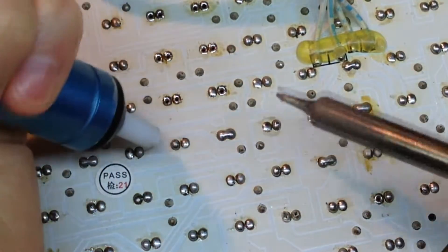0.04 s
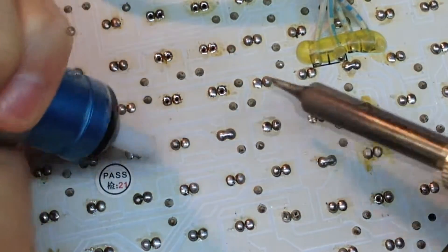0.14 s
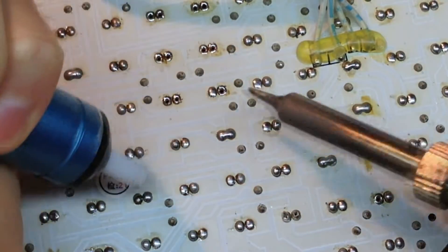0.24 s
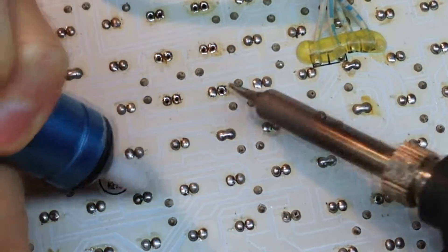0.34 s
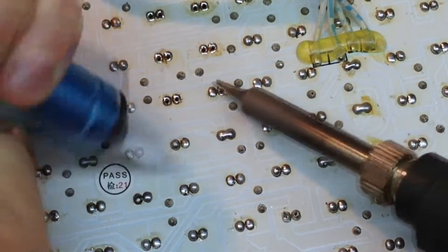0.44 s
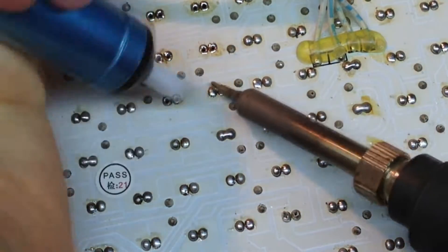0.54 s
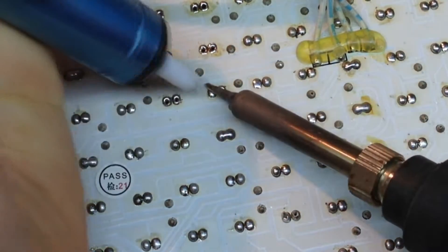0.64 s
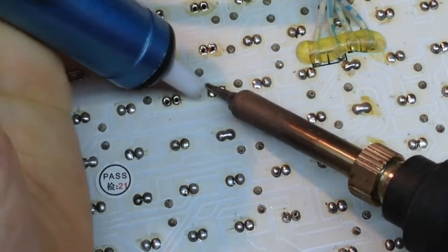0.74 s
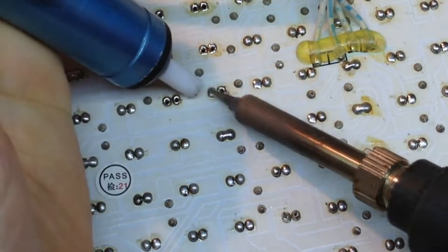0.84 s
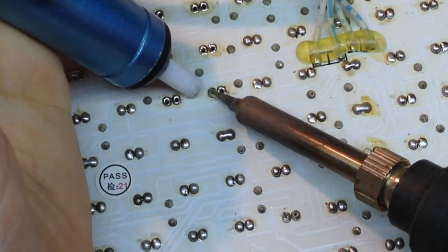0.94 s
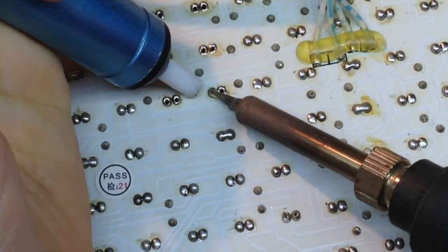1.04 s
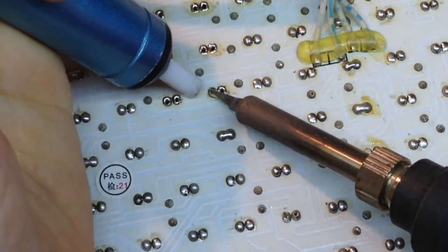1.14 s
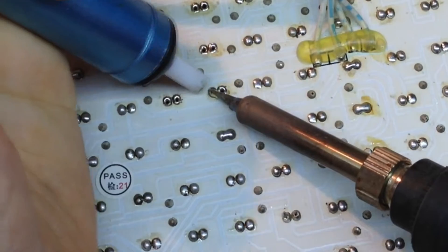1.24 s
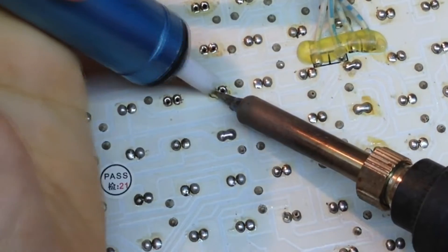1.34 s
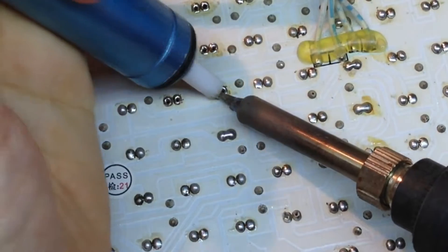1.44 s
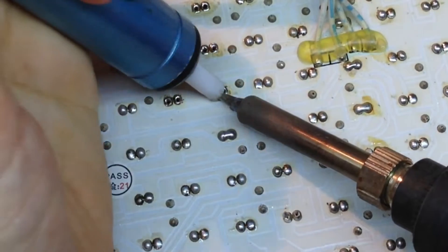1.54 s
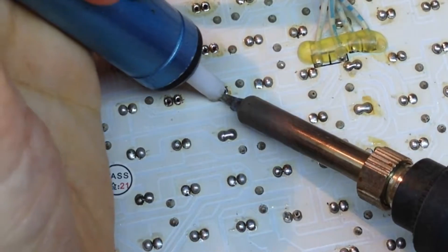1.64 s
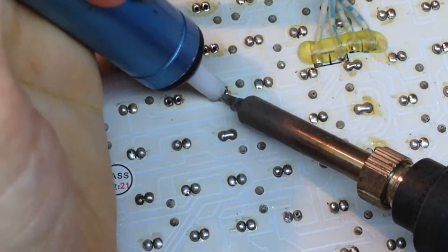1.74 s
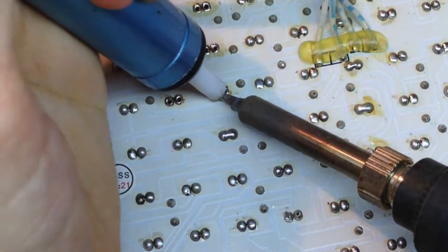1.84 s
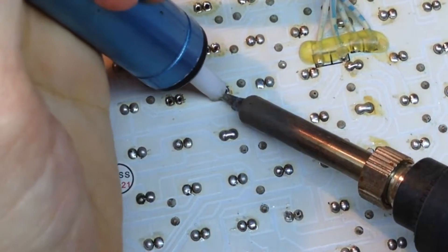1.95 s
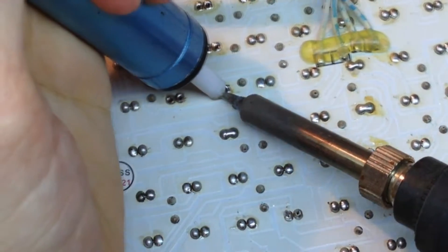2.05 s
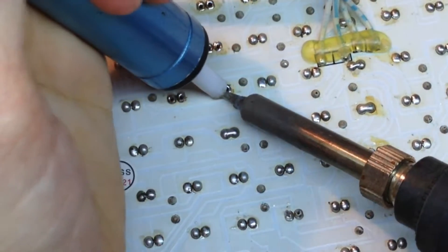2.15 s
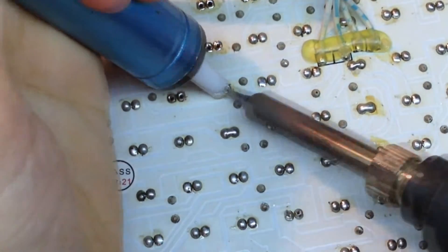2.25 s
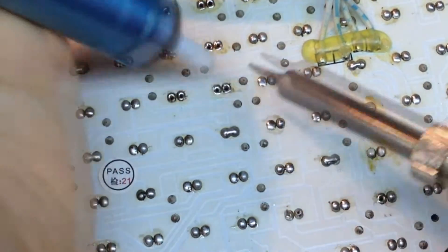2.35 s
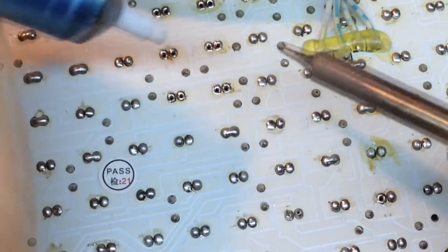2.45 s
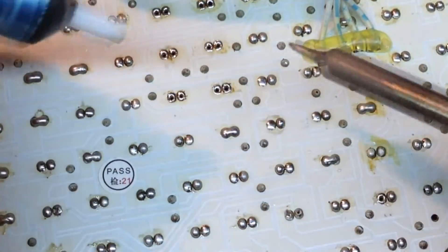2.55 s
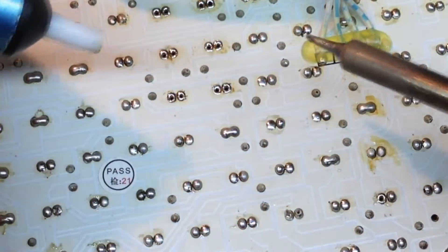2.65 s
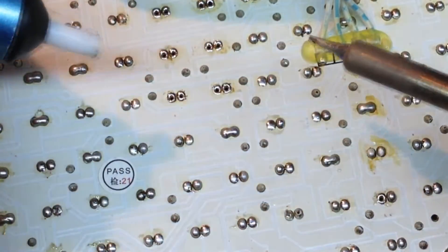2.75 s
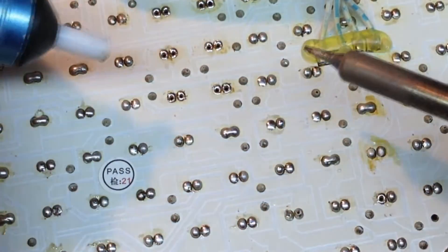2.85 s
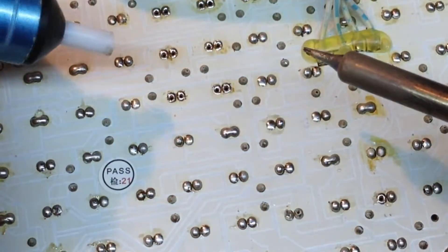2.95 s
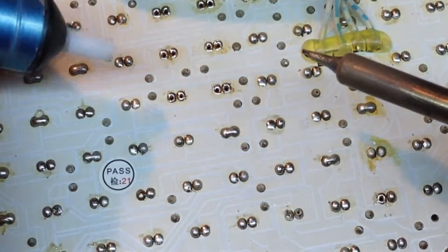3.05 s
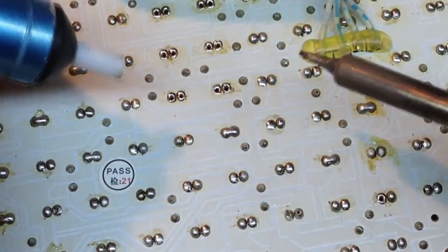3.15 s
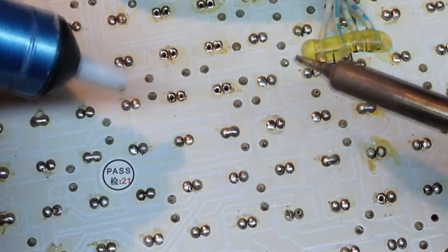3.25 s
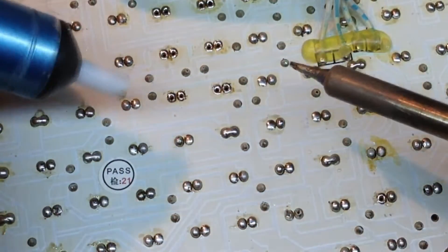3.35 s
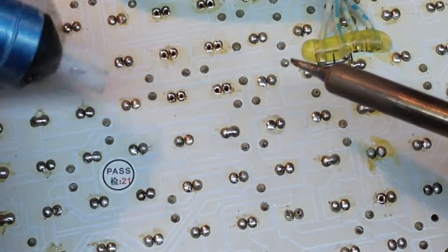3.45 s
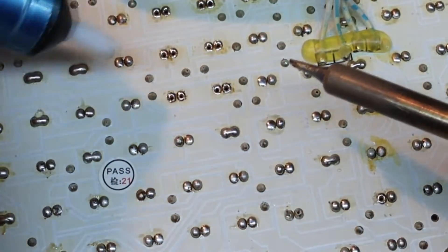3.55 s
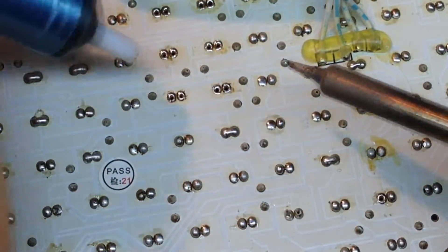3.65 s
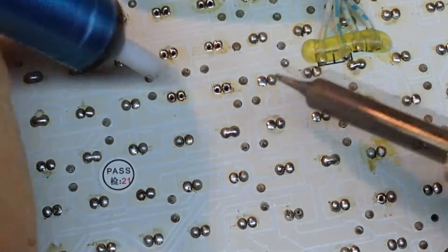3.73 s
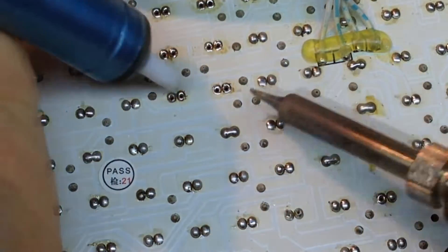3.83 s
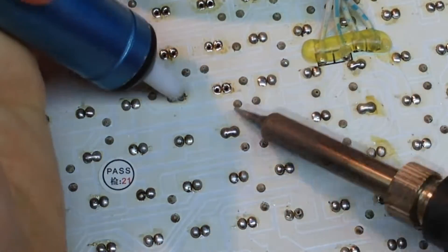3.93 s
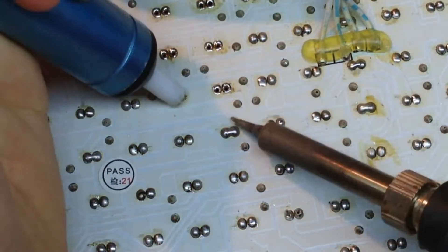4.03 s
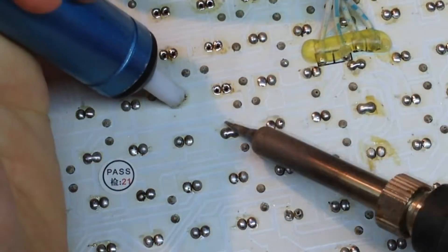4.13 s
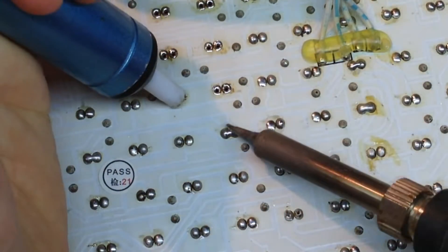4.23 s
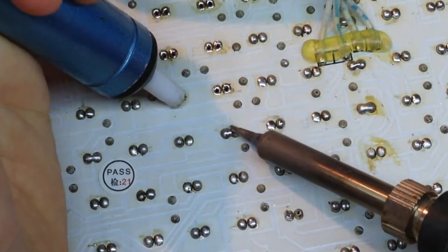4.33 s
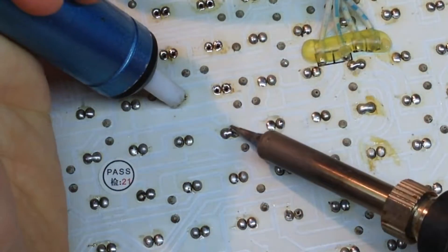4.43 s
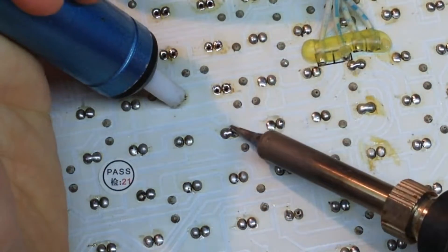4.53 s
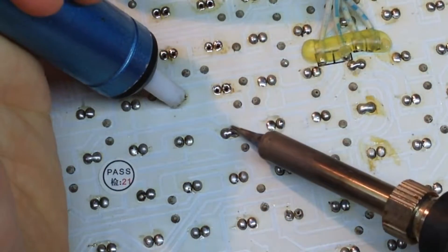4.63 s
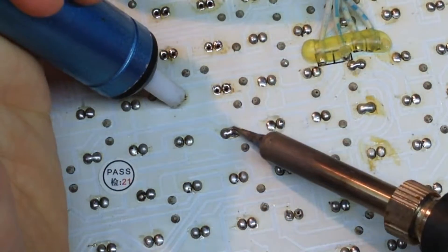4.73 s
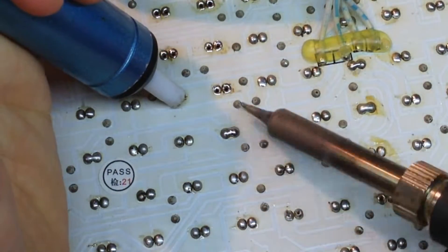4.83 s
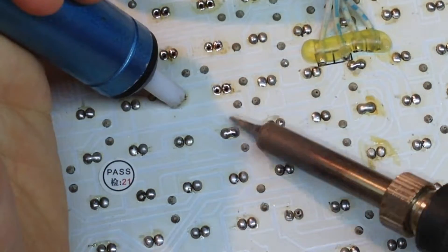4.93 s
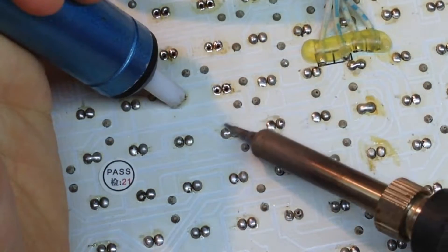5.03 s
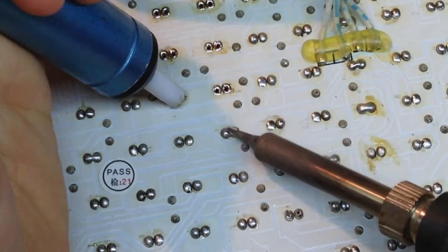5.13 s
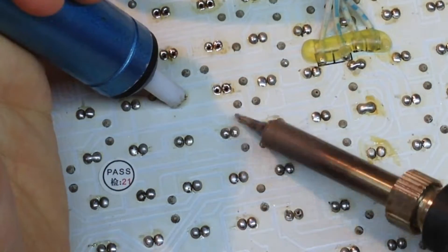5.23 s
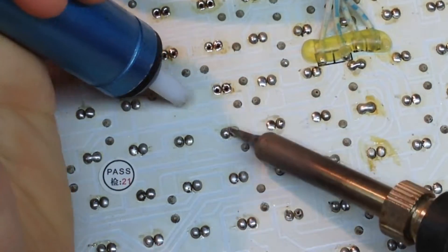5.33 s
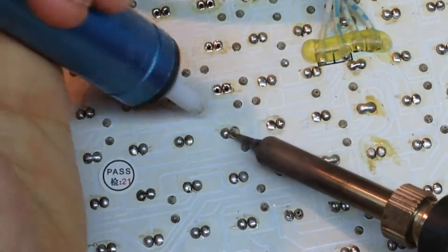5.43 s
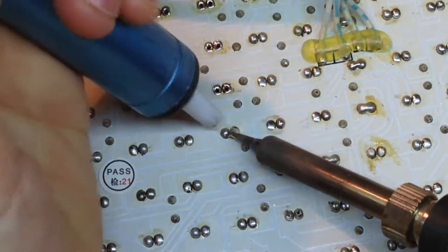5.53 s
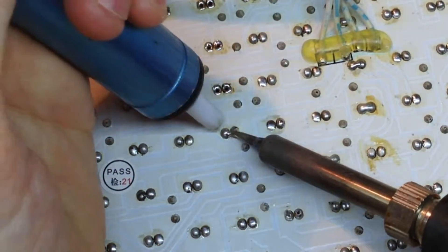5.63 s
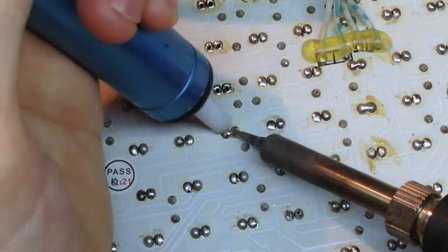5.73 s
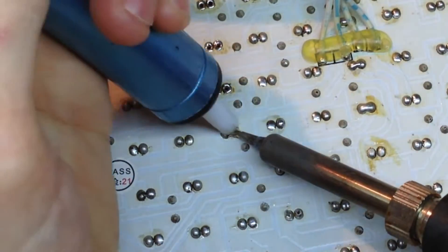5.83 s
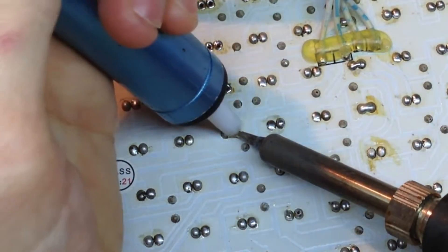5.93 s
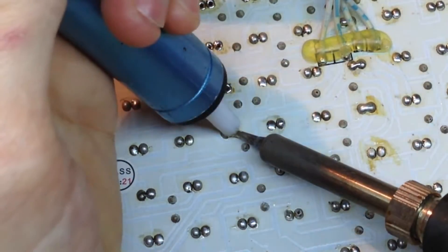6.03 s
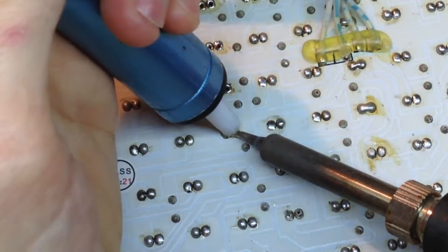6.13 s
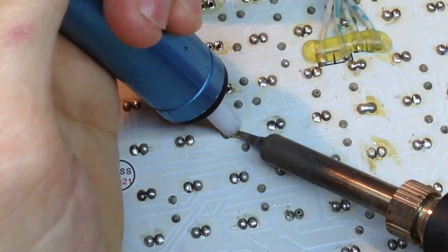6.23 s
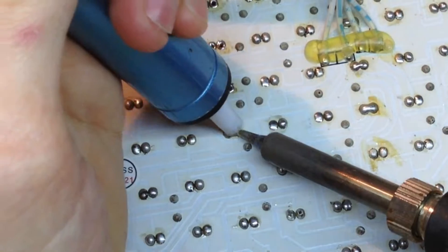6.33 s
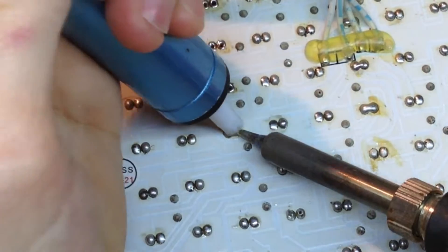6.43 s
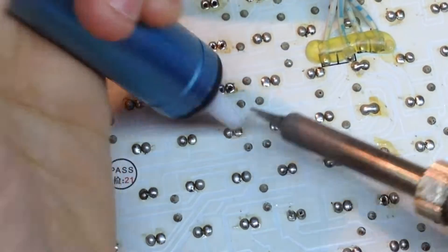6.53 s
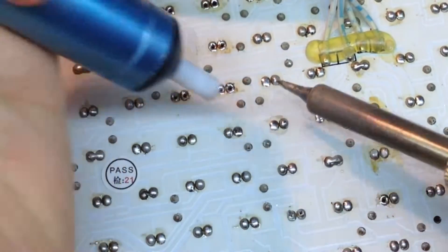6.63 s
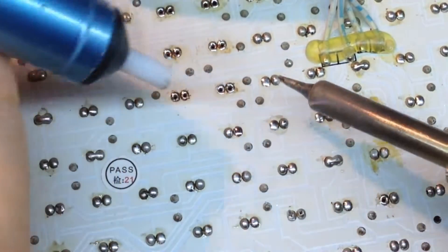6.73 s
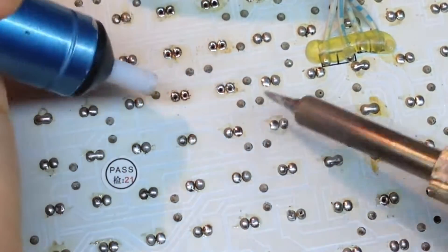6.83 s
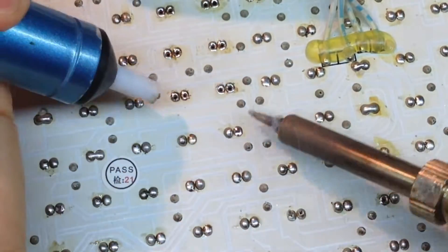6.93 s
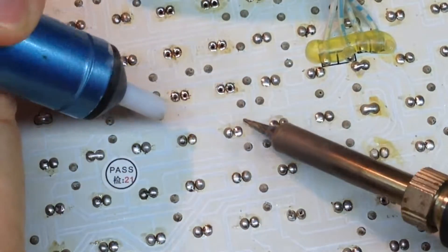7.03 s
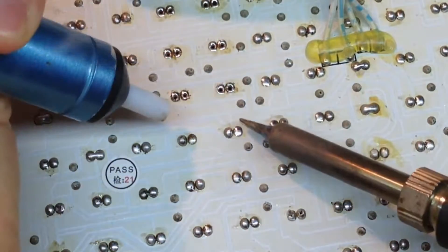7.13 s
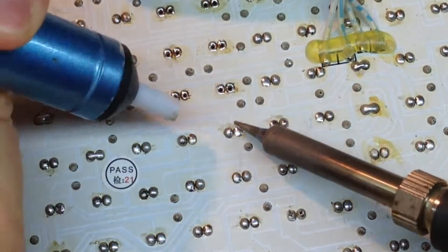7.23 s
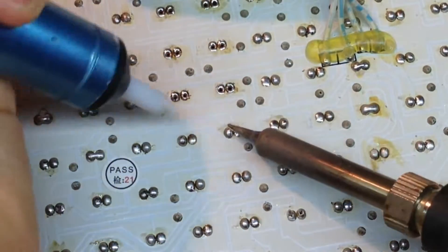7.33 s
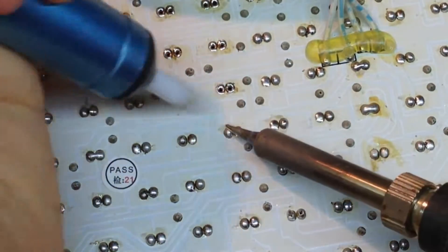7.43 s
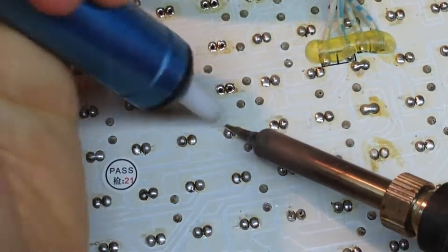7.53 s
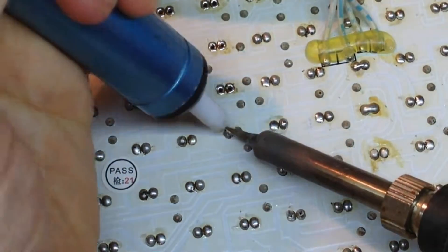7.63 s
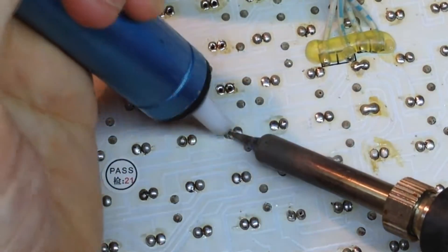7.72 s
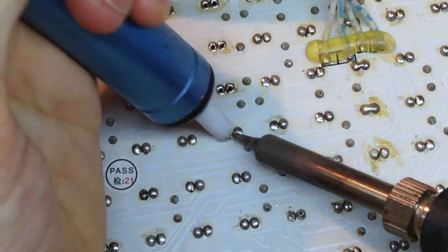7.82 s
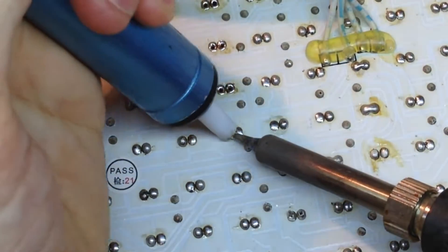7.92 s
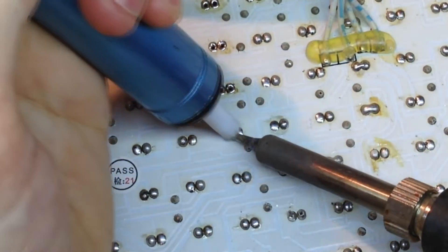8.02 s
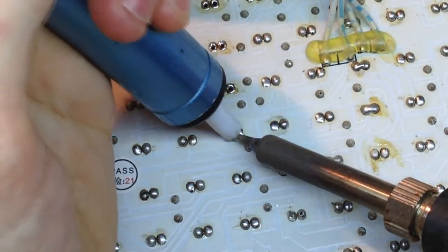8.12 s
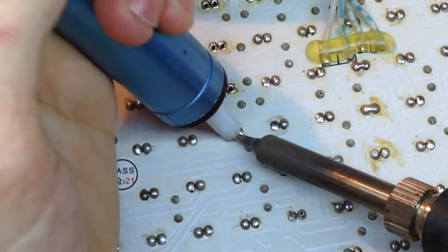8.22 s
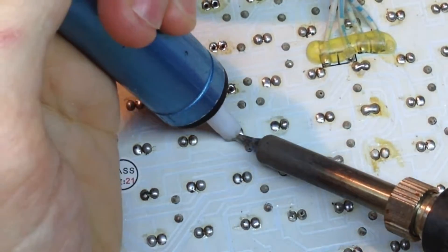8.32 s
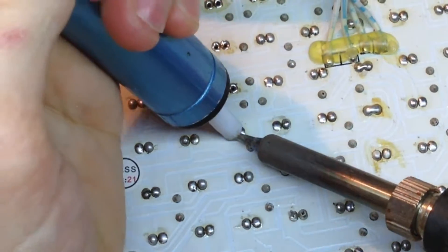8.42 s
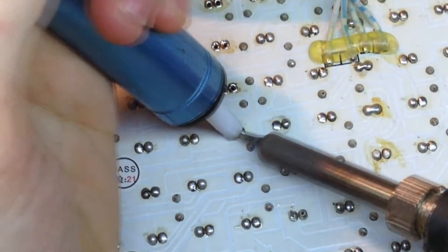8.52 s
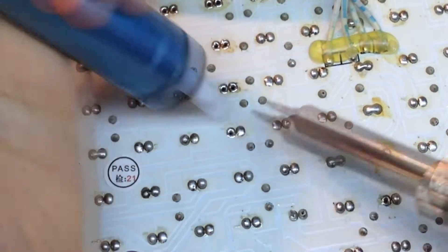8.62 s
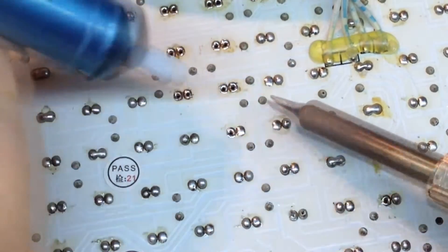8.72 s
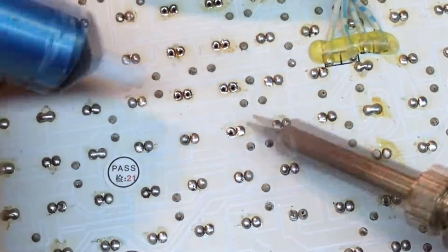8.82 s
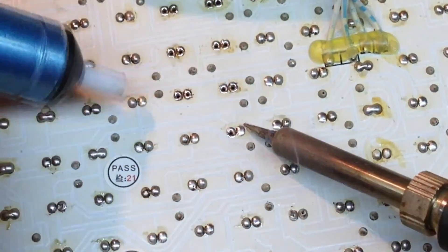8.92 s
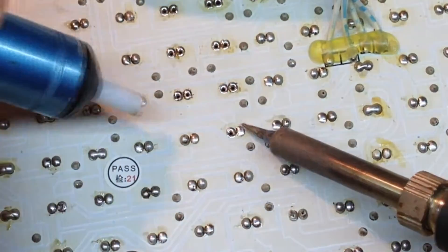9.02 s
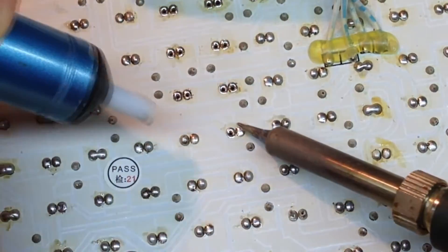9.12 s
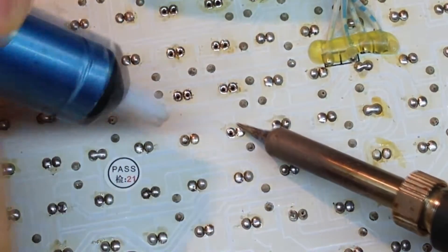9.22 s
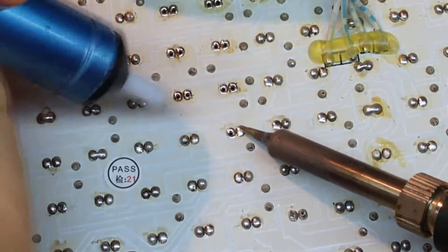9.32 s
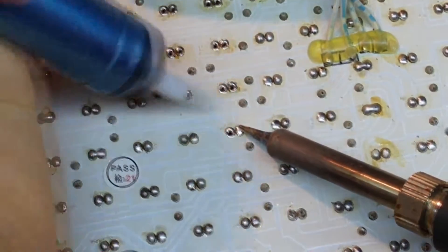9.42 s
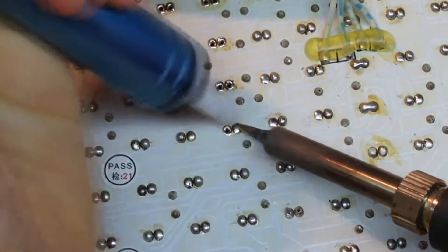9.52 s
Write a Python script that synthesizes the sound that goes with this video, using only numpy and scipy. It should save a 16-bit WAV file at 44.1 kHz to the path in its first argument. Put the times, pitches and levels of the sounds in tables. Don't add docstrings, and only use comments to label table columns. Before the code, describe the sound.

Close to a small camera microphone at an indoor workbench, a plunger rubs up and latches with a loud bright click, then a duller hollow tock as the thumb lets go. The pump fires with a snap, air rush and clattering stop. This reset and shot cycle repeats, ending on another reset. Tiny tip taps and button ticks fall between, over a low mains-like hum.

```python
import sys
import numpy as np
from scipy import signal
from scipy.fft import rfft, irfft, next_fast_len
from scipy.io import wavfile
from scipy.ndimage import uniform_filter1d

SR = 44100
rng = np.random.default_rng(int(sys.argv[2]) if len(sys.argv) > 2 else 0)


def master_out(mix):
    frames = np.transpose(np.atleast_2d(mix))
    ceiling = np.clip(frames, -1, 1)
    pcm = np.round(ceiling * 32767).astype(np.int16)
    wavfile.write(sys.argv[1], SR, pcm)


def volts_from_decibels(level):
    exponent = np.asarray(level, float) / 20
    return 10 ** exponent


N = 422037
TOP_HZ = 14250


def unit(x):
    return x / np.sqrt(np.mean(x ** 2) + 1e-20)


def along(points, hz):
    point_hz, value = np.transpose(points)
    return np.interp(np.log(hz + 1), np.log(point_hz + 1), value)


def noise(response):
    m = next_fast_len(N)
    spectrum = rfft(rng.standard_normal(m))
    return unit(irfft(spectrum * response(np.fft.rfftfreq(m, 1 / SR)), m)[:N])


def colour(spectrum):
    return lambda hz: volts_from_decibels(along(spectrum, hz))


def add(track, s, sound):
    part = track[round(s * SR):][:len(sound)]
    part += sound[:len(part)]


def ring(modes, lift_db=0, rise=.0003, length=.1):
    t = np.arange(int(length * SR))[:, None] / SR
    hz, width, db = np.transpose(modes)
    swing = volts_from_decibels(db + lift_db) * np.sin(2 * np.pi * hz * t) * np.exp(-np.pi * width * t) / hz
    onset = 1 - np.exp(-t[:, 0] / rise)
    sound = np.gradient(swing.sum(axis=1) * onset)
    return sound / np.abs(sound).max()


def patchy(x, depth_db, size):
    z = signal.stft(x, nperseg=256)[2]
    field = uniform_filter1d(rng.standard_normal(z.shape), size=size[0], axis=0)
    field = uniform_filter1d(field, size=size[1], axis=1)
    return unit(signal.istft(z * volts_from_decibels(depth_db * unit(field)), nperseg=256)[1][:N])


# release_s, flight_s, catch_peak_db, bounce_pace (ratio), bench_rock_db
PUMP_SHOTS = [
    (2.1301, .0142, -10, .87, -37),
    (6.3769, .0131, -8, 1.2, -33.5),
    (8.468, .0161, -10, .98, -46),
]
# pitch_hz, width_hz, level_db
CATCH_MODES = [(1200, 430, -17.5), (4210, 560, 1), (9250, 1200, -16.5)]
# pitch_hz, width_hz, level_db
BENCH_MODES = [(90, 35, 2), (165, 42, 3.5), (330, 60, -9), (550, 32, -6)]
# pitch_hz, width_hz, level_db
BARREL_MODES = [(1265, 9, -8), (1358, 10, -4), (1456.6, 11, -1.5), (1825, 20, -0.5), (2380, 9.6, -3),
                (2450, 12, -4), (2770, 22, -7), (3120, 14, -13), (3467, 12, -14)]
# freq_hz, level_db (per Hz)
RUSH_SPECTRUM = [(180, -38.5), (300, -11.5), (833, -9), (1480, -2), (3120, -6.5), (6020, -10.5),
                 (6760, -16), (8510, -12.5), (13300, -22), (15400, -50.5)]
# freq_hz, level_db (per Hz)
RATTLE_SPECTRUM = [(120, -55.5), (200, -28), (314, -7), (405, -20.5), (671, -14), (1050, -14.5),
                   (1500, -3.5), (1950, -8.5), (2600, -4), (2950, -12), (12100, -50), (14200, -48),
                   (15000, -75.5)]
# flight_share (ratio), level_db over the catch, pitch_hz
WALL_GRAZES = [
    (.3, 0, 1503),
    (.55, -5, 2485),
    (.72, -2, 1500),
]
# delay_s at pace 1, level_db over the catch, pitch_hz
STOP_SLAMS = [
    (.0003, 1, 1250),
    (.0026, 4.5, 1680),
    (.0062, 4, 1550),
]


def shots():
    out, rush, rattle, t = np.zeros(N), np.zeros(N), np.zeros(N), np.arange(N) / SR
    rush_db, rattle_db, thump_db = -11.5, -9.5, -24
    for go, flight, db, pace, _ in PUMP_SHOTS:
        stop = go + flight
        add(out, go, volts_from_decibels(db) * ring(CATCH_MODES))
        thump = ring(BENCH_MODES, rng.standard_normal(len(BENCH_MODES)), rise=.004)
        add(out, go + .0059, volts_from_decibels(thump_db) * thump)
        barrel = ring(BARREL_MODES, 3 * rng.standard_normal(len(BARREL_MODES)), rise=.0032, length=.28)
        add(out, stop + .005, volts_from_decibels(db + rattle_db - 4.5) * barrel)

        before, after = np.clip(go - t, 0, 1), np.clip(t - stop, 0, 1)
        creep_db = -13 * (t < go) - 60 * before / .012
        rush += volts_from_decibels(db + rush_db + creep_db - 60 * np.clip(after - .004, 0, 1) / .014)

        since = np.clip(t - stop - .007, 0, 1)
        rise = volts_from_decibels(-60 * np.clip(stop - t, 0, 1) / .0045) * (t > go)
        decay = volts_from_decibels(-60 * since / .051) + volts_from_decibels(-15.5 - 60 * since / .42)
        rattle += volts_from_decibels(db + rattle_db) * rise * decay

        blows = [(go + share * flight, d, hz) for share, d, hz in WALL_GRAZES]
        blows += [(stop + pace * s, d, hz) for s, d, hz in STOP_SLAMS]
        blows += [(stop + .0195, -8, 1500)]
        for s, blow_db, hz in blows:
            hz = hz * np.exp(.059 * rng.standard_normal())
            modes = [(hz, 380, 0), (1.55 * hz, 600, -6), (.6 * hz, 400, -6), (760, 300, -15)]
            add(out, s, volts_from_decibels(db + blow_db) * ring(modes, rise=.0003, length=.02))
    lumps = volts_from_decibels(3.4 * noise(lambda hz: hz < 300))
    return out + rush * noise(colour(RUSH_SPECTRUM)) + rattle * unit(lumps * noise(colour(RATTLE_SPECTRUM)))


# start_s, end_s, early_db, end_db
PLUNGER_STROKES = [
    (.232, .368, -51.5, -58.5),
    (.45, .512, -59.5, -53.5),
    (3.14, 3.3, -62, -58),
    (3.405, 3.462, -53, -56.5),
    (7.065, 7.242, -57.5, -56),
    (9.059, 9.198, -57.5, -65),
    (9.325, 9.352, -43.5, -47),
]
# freq_hz, level_db (per Hz)
RUB_SPECTRUM = [(800, -26.5), (1400, -1.5), (2200, -8), (3300, -1), (4200, -3), (5200, -6), (6400, -2),
                (8500, -11), (10200, -13.5), (11500, -23), (14000, -53)]


def slide():
    t, level = np.arange(N) / SR, np.zeros(N)
    grip_s, grip_db = .039, -23
    for start, end, early_db, end_db in PLUNGER_STROKES:
        turns = [start, min(start + grip_s, end), end]
        db = np.interp(t, turns, [early_db + grip_db, early_db, end_db])
        level += volts_from_decibels(db) * (t > start) * (t < end)
    slips = volts_from_decibels(2.2 * noise(lambda hz: hz < 120))
    return level * unit(slips * patchy(noise(colour(RUB_SPECTRUM)), depth_db=3, size=(4, 11)))


def clicks(rows, modes, pivot_hz, zones_hz, shiver, lead_db, grit_db, grit_t60, fizz_db, hiss_db, hiss_t60):
    out, lead, hiss, t = np.zeros(N), np.zeros(N), np.zeros(N), np.arange(SR // 3) / SR
    early = 600
    for s, db, *strengths in rows:
        tilt = sorted([(pivot_hz, 0), (SR / 2, 0), *zip(zones_hz, strengths)])
        body = ring(modes, lift_db=along(tilt, np.transpose(modes)[0]))
        grit, fizz = rng.standard_normal((2, len(t)))
        grit = volts_from_decibels(grit_db - 60 * t / grit_t60) * grit
        fizz = np.diff(fizz, prepend=0)
        add(out, s, volts_from_decibels(db - .5) * body)
        add(out, s + .0032, volts_from_decibels(db - 14) * body)
        add(out, s, volts_from_decibels(db) * signal.fftconvolve(grit, body / np.linalg.norm(body)))
        add(out, s, volts_from_decibels(db + fizz_db - 60 * t / .039) * fizz)
        add(lead, s - early / SR, volts_from_decibels(db + lead_db - 60 * t / .02)[early::-1])
        add(out, s - early / SR, (volts_from_decibels(db + fizz_db - 60 * t / .015) * fizz)[early::-1])
        add(hiss, s, volts_from_decibels(db + hiss_db - 60 * t / hiss_t60) * np.minimum(t / .004, 1))
    return out + lead * noise(colour(RUB_SPECTRUM)) + hiss * noise(colour(shiver))


# start_s, peak_db, near_1k_db, near_6k_db, near_10k_db (over the modes near 3 kHz)
LATCH_CLICKS = [
    (.3706, -1, 2, 6.5, 2),
    (3.3015, -2.5, 9, 10, 14.2),
    (7.245, -1, -1, -2.5, 9),
    (9.2106, -2, -5.5, -6.5, 7),
]
# pitch_hz, width_hz, level_db
LATCH_MODES = [(980, 420, -18.5), (1240, 540, -23), (2310, 170, -19.5), (3075, 460, -8), (3257, 38, -29),
               (3250, 310, -4), (4800, 460, -11), (5960, 45, -35), (6100, 500, -4.5), (7500, 580, -5.5),
               (8620, 740, -1.5), (9900, 1400, -2), (13400, 800, -14.5)]
# freq_hz, level_db (per Hz)
SPRING_SPECTRUM = [(410, -44.5), (750, -17), (990, -6), (1150, -13.5), (1800, -12.5), (2800, -5.5),
                   (3200, -1), (3600, -8), (4300, -7), (6000, -6.5), (9000, -11), (13700, -24),
                   (15000, -41.5)]


def latches():
    return clicks(LATCH_CLICKS, LATCH_MODES, 3000, [1000, 6000, 10000], SPRING_SPECTRUM, lead_db=-28.5,
                  grit_db=-17.5, grit_t60=.015, fizz_db=-36.5, hiss_db=-32, hiss_t60=.21)


# start_s, peak_db, near_3k_db, near_10k_db (over the modes near 1 kHz)
THUMB_TOCKS = [
    (.5135, -11, 3.6, 8.7),
    (3.4683, -14, 0.1, 8.5),
    (7.3714, -16, 1.5, 6.2),
    (9.3544, -15, 1.8, 7.7),
]
# pitch_hz, width_hz, level_db
TOCK_MODES = [(510, 560, -19), (670, 240, -1), (1000, 21, -24), (992, 98, 1), (1490, 570, -19),
              (2060, 110, -12.5), (2730, 86, -12.5), (3220, 340, 1), (3250, 26, -26.5), (4030, 430, -10.5),
              (6085, 440, -15.5), (8387, 1400, -17), (9530, 450, -9.5), (12650, 3800, -20)]
# freq_hz, level_db (per Hz)
SHELL_SPECTRUM = [(290, -18.5), (600, -4.5), (1020, -0.5), (1410, -9.5), (2700, -14), (3280, -4.5),
                  (3750, -15.5), (5160, -20.5), (13800, -30.5), (14400, -25.5), (15000, -27.5)]


def tocks():
    return clicks(THUMB_TOCKS, TOCK_MODES, 1000, [3200, 10000], SHELL_SPECTRUM, lead_db=-17,
                  grit_db=-25, grit_t60=.03, fizz_db=-26, hiss_db=-30, hiss_t60=.32)


# start_s, peak_db, brightness_db
BOARD_TAPS = [(0.2607, -48, 6), (0.6853, -33.5, -18), (1.5757, -50, -6.5), (4.1325, -38, -10),
              (4.1357, -50, -12), (4.1599, -48, -16), (4.1915, -48, -23), (4.2418, -47.5, -21),
              (4.3136, -49, 1), (4.3244, -54.5, -2), (4.3364, -54.5, 7), (5.0779, -31.5, -4.5),
              (5.3765, -23, -2.5), (5.7678, -51.5, -2.5), (9.0647, -40.5, -9.5), (9.0707, -46, -10)]
# pitch_hz, width_hz, level_db
BOARD_MODES = [(437, 57, -27), (780, 110, -16.5), (990, 170, -9), (1400, 130, -8), (1600, 420, -2.5),
               (2530, 300, 1.5), (3320, 350, -9), (4670, 340, -14.5), (5794, 260, -21)]


def taps():
    return clicks(BOARD_TAPS, BOARD_MODES, 1400, [2800], RATTLE_SPECTRUM, lead_db=-40.5,
                  grit_db=-13.5, grit_t60=.028, fizz_db=-50, hiss_db=-22, hiss_t60=.12)


# start_s, peak_db
BUTTON_TICKS = [
    (2.3655, -35.5),
    (6.5819, -28.5),
    (8.6702, -36),
]
# pitch_hz, width_hz, level_db
BUTTON_MODES = [(4660, 2000, 9), (7060, 1800, 12.5), (10250, 2000, 13.5)]


def ticks():
    return clicks(BUTTON_TICKS, BUTTON_MODES, 5000, [], RUB_SPECTRUM, lead_db=-21,
                  grit_db=-22.5, grit_t60=.017, fizz_db=-37, hiss_db=-32, hiss_t60=.042)


# pitch_hz, width_hz, level_db
ROCK_MODES = [(56.4, 30, -16), (93, 24, 1), (183, 40, -6.5)]


def thuds():
    out = np.zeros(N)
    period_s, loss_db = .051, 4.5
    for go, *_, db in PUMP_SHOTS:
        for k in range(4):
            bump = ring(ROCK_MODES, 3 * rng.standard_normal(len(ROCK_MODES)), rise=.012)
            add(out, go + period_s * (k + 1), volts_from_decibels(db - loss_db * k) * bump)
    return out


# freq_hz, t60_s
WALL_DECAY = [(100, 0.98), (500, 0.6), (2000, 0.61), (6000, 0.43), (12000, 0.099)]


def room(x):
    out, step = np.zeros(N), SR // 4
    for start in range(0, N, step):
        piece = x[start:start + step]
        if not piece.any():
            continue
        hz, t, z = signal.stft(rng.standard_normal(SR // 2), SR, nperseg=256)
        decay = volts_from_decibels(-60 * t / along(WALL_DECAY, hz)[:, None])
        tail = signal.istft(z * decay, SR, nperseg=256)[1]
        add(out, start / SR + .005, signal.fftconvolve(piece, tail / np.linalg.norm(tail)))
    return out


# freq_hz, level_db (per Hz)
AIR_SPECTRUM = [(15, -29.5), (30, -16), (64, -13), (95, -8.5), (160, -13), (300, -12.5), (450, -9),
                (800, -15.5), (1000, -19), (1420, -22), (1900, -23), (5000, -30), (13500, -33),
                (15400, -31.5)]
# pitch_hz, width_hz, level_db (rms)
HUM_BANDS = [(99, 16, -71.5), (200.2, 4.9, -75.5), (302.4, 11, -69.5), (394, 10, -80.5), (548, 10, -73),
             (598, 12, -74), (775, 51, -70), (1404, 25, -78.5)]


def air():
    def bands(f):
        return np.sqrt(sum(volts_from_decibels(2 * d) * w ** 3 / ((f - c) ** 2 + w * w / 4) ** 2 for c, w, d in HUM_BANDS))

    hum = np.linalg.norm(volts_from_decibels(np.transpose(HUM_BANDS)[2])) * noise(bands)
    waver_hz = 99 + 6 * noise(lambda f: f < 12)
    motor = volts_from_decibels(-64.5) * np.sin(2 * np.pi * np.cumsum(waver_hz) / SR)
    rush = volts_from_decibels(-60.5) * noise(lambda f: colour(AIR_SPECTRUM)(f) * (f < TOP_HZ))
    return rush + hum + motor


# level_db of shots, latches, lighter clicks
ROOM_SHARE_DB = [-21, -24, -28]


def scene():
    shot, latch, light = shots(), latches(), tocks() + taps()
    wet = room(volts_from_decibels(ROOM_SHARE_DB) @ [shot, latch, light])
    mix = shot + thuds() + latch + light + ticks() + slide() + wet + air()
    return np.tile(mix, (2, 1))


def top_cut(x):
    return signal.sosfilt(signal.butter(12, 15560, fs=SR, output="sos"), x)


# attack_s, lowest_hz, loss_db
THINNED = [
    (3.3015, 900, -30),
    (3.4683, 1200, -7),
    (5.3775, 1800, -10),
    (6.3764, 1200, -30),
    (6.5819, 6300, -25),
    (7.3714, 8000, -25),
    (8.466, 400, -30),
    (9.2106, 500, -30),
]


def record(dry):
    keep, ease = np.exp(-1 / (.3 * SR)), np.exp(-1 / (.08 * SR))
    power = signal.lfilter([1 - keep], [1, -keep], dry[0] ** 2)
    duck_db = signal.lfilter([1 - ease], [1, -ease], -1.55 * np.log(1 + power / volts_from_decibels(-82)))
    hz, t, z = signal.stft(dry[0] * volts_from_decibels(duck_db), SR, nperseg=128)

    block_s, block_start_s, lookahead_s = 1024 / 44100, .0169, .005
    for s, low_hz, loss_db in THINNED:
        start = s - (s - block_start_s) % block_s
        z[np.ix_(hz > low_hz, (t > start) & (t < s - lookahead_s))] *= volts_from_decibels(loss_db)

    share_db = along([(3000, -79), (4300, -43.5), (5500, -21.5), (13000, -12.5), (14000, -45.5)], hz)
    scatter = np.exp(2j * np.pi * rng.random(z.shape))
    pair = [z, z * volts_from_decibels(share_db)[:, None] * scatter]
    mid, side = signal.istft(pair, SR, nperseg=128)[1][:, :N]

    m = next_fast_len(N)
    f = np.fft.rfftfreq(m, 1 / SR)
    treble_edge = volts_from_decibels(along([(TOP_HZ, 0), (TOP_HZ + 250, -20), (TOP_HZ + 2500, -40)], f))
    bass_edge = 1j * f / (45 + 1j * f)
    mix = irfft(rfft([mid + side, mid - side], m) * treble_edge * bass_edge, m)[:, :N]
    return top_cut(mix)


dry = scene()
out = record(dry)
master_out(out)
```